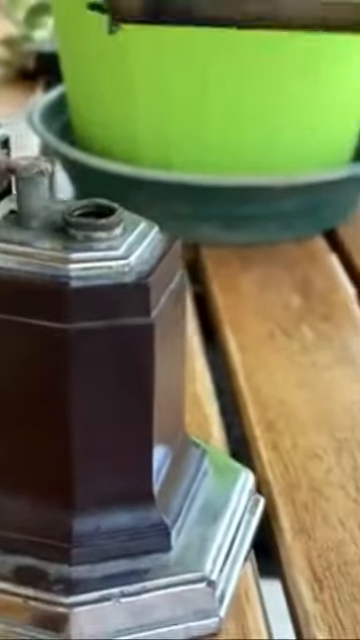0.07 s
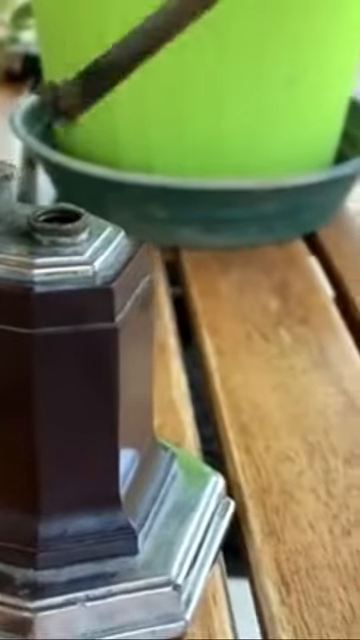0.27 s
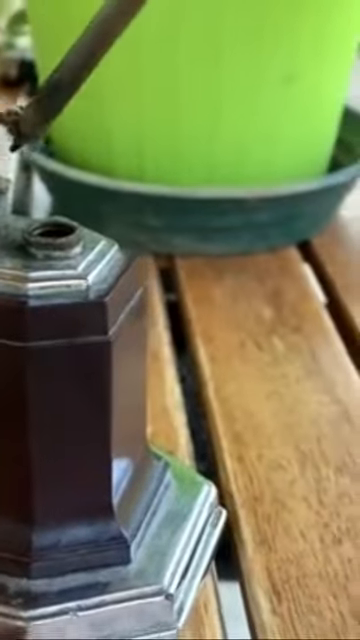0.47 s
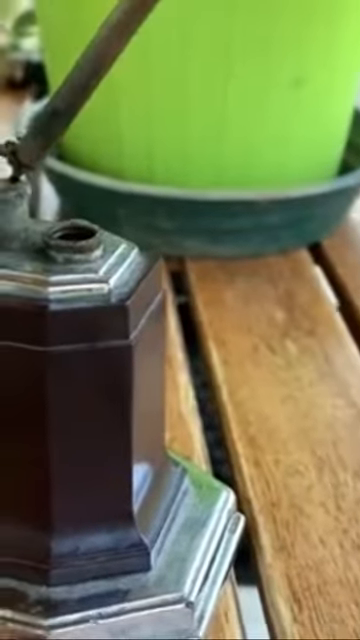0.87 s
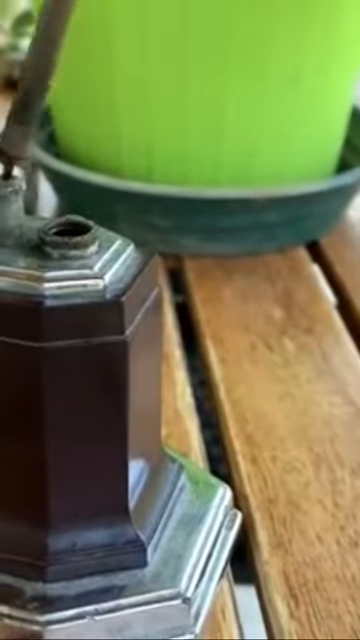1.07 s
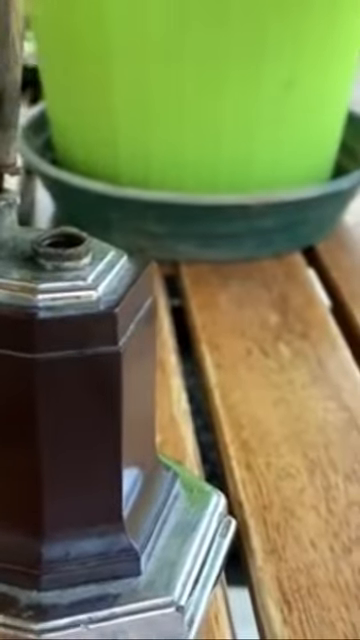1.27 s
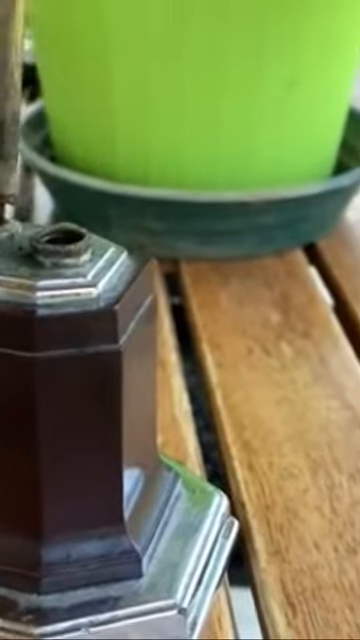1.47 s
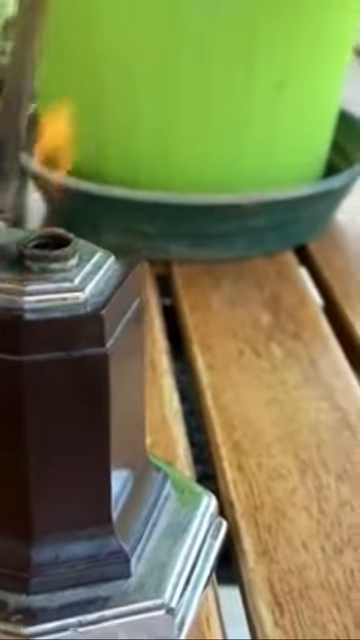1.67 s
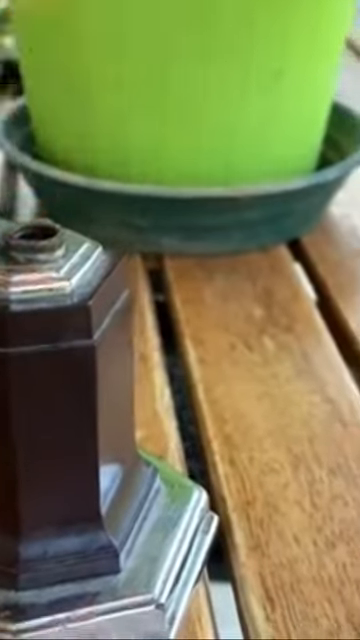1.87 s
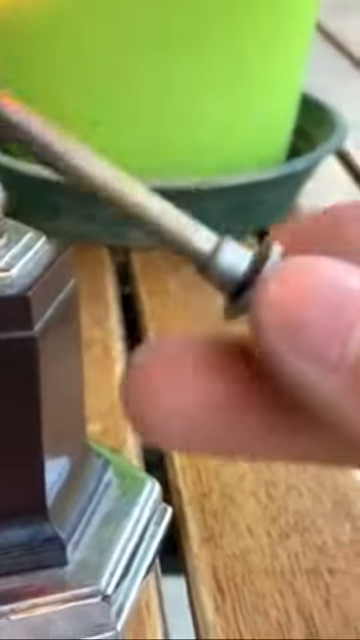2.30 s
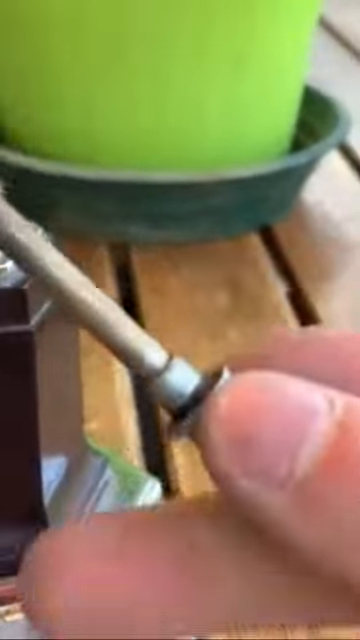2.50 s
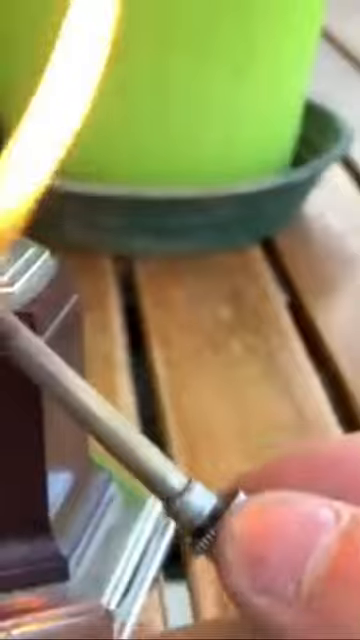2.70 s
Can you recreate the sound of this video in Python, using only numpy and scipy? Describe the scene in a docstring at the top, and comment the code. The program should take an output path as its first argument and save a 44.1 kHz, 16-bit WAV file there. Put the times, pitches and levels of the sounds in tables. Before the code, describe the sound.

Three metallic scrapes of a lighter's striker rod, then a soft flame, among buzzing cicadas.

```python
"""Three metallic scrapes with low thuds, then a fluttering flame, among cicadas outdoors.
A striker rod runs down the flint of a table lighter standing on a wooden garden table; each scrape is a
burst of tiny slips ringing in case, rod and flint, and the last one lights the flame. One cicada pulses
its tymbal clicks, a second joins in on the left and more hiss in the trees, over a faint rumble."""
import sys
import numpy as np
from scipy import signal
from scipy.fft import rfft, irfft
from scipy.io import wavfile
from scipy.ndimage import uniform_filter1d

SR = 44100
rng = np.random.default_rng(int(sys.argv[2]) if len(sys.argv) > 2 else 0)


def file_out(sig):
    """Save sig as 16-bit WAV at sys.argv[1]."""
    # one column per channel
    cols = np.atleast_2d(sig).T
    # limit, then scale
    lim = np.clip(cols, -1, 1)
    pcm = np.round(lim * 32767).astype(np.int16)
    wavfile.write(sys.argv[1], SR, pcm)


N = 125685
T = np.arange(N) / SR
HZ = np.fft.rfftfreq(N, 1 / SR)

# rod slips: peak t/s, rise/s, fall/s, case level/dB, rod level/dB, flint level/dB, relative ring/dB
SLIPS = [(1.3779, 0.0041, 0.0019, -28, -47, -31.5, -14), (1.3943, 0.0024, 0.0031, -17, -19.5, -26.5, -18.5),
         (1.3951, 0.00017, 0.0004, -17, -13, -18.5, -6), (1.5241, 0.0017, 0.021, -42, -55, -48, -5),
         (1.5466, 0.0013, 0.0028, -19.5, -14, -16, -9.5), (1.5475, 0.00092, 0.00089, -34, -11, -20, -10),
         (1.5500, 0.0015, 0.0013, -15.5, -10.5, -14.5, -15), (1.692, 0.011, 0.0042, -44.5, -46, -39, 2),
         (1.7548, 0.00036, 0.002, -27.5, -20.5, -14.5, -2.5),
         (1.7642, 0.0011, 0.0033, -22.5, -19.5, -13.5, -5), (1.77, 0.0011, 0.0018, -36, -21, -20, 6),
         (1.773, 0.0013, 0.0019, -27, -13, -10.5, 1), (1.7792, 0.0019, 0.0013, -32.5, -16.5, -12.5, -4),
         (1.7873, .002, 0.011, -59, -26, -33.5, -11)]


def striker():
    """Case, rod and flint sound together, close to the two microphones."""
    rod_modes = [(4660, -18, .02), (4576, 1.5, 0.023), (5660, -0.5, 0.017), (6800, -16, 0.0068),
                 (7440, -16, 0.021), (7860, 12.5, 0.0085), (8000, -1, 0.015)]  # f/Hz, level/dB, t60/s
    flint_modes = [(9200, 2, 0.087), (10701, -6, 0.09), (10924, -5, .08), (11400, 8, .08), (11575, 0, 0.13),
                   (11900, -8, .09), (12400, 1, .08), (12400, -8, 0.062), (13574, -4, .08),
                   (13600, -1, 0.11), (14444, -1, .08), (14811, 1, .08), (15212, -8, .07)]  # f/Hz, level/dB, t60/s
    rod_grit = [(2000, -22.5), (3400, -9), (4600, 2), (6000, -8), (7500, 6), (8800, 0), (9800, -29),
                (12000, -25)]  # friction spectrum: f/Hz, level/dB
    flint_grit = [(7000, -14.5), (9700, 0.5), (10250, -12), (10700, 0.5), (12600, 6), (15200, -2),
                  (15900, -7)]  # friction spectrum: f/Hz, level/dB
    balance = [(600, -0.5), (1400, 4), (2700, 3.5), (5000, 12.5), (7000, -0.5), (9000, -0.5), (11000, 0)]  # f/Hz, left over right/dB
    left_lead = [(100, 4.5), (700, -1.1), (1500, 1.5), (2600, -1.5), (5000, -3.5), (7000, -5.5), (8100, -2),
                 (10000, -3.0), (10900, 1.94), (15000, 0.2)]  # f/Hz, phase/rad
    mono = case() + scrape(SLIPS, 4, rod_modes, rod_grit, ring_db=-0.5)
    mono += scrape(SLIPS, 5, flint_modes, flint_grit, ring_db=-11.5)
    half = amp(curve(balance, HZ) / 2) * np.exp(.5j * curve(left_lead, HZ))
    return irfft(rfft(mono) * np.array([half, 1 / half]), N)


def case():
    """The rod seats differently on each stroke, colouring the case's rasp and modes."""
    modes = [(576, -5.5, .11), (787, -3, 0.052), (931, -4, 0.083), (1175, -6, 0.04), (1295, -4, .06),
             (1400, -15, 0.054), (1800, -2, .055), (2147, -7, 0.053), (2390, -4, 0.066), (2730, -3.5, .06)]  # f/Hz, level/dB, t60/s
    # friction spectrum per stroke: f/Hz, level/dB
    first = [(100, -34), (420, -26), (590, 2), (900, -0.5), (1040, -8), (1330, 4), (1560, -0.5),
             (1700, -11), (2000, -11), (2220, 1.5), (2750, -3), (3200, -20), (6000, -55)]
    second = [(100, -27), (420, -9.5), (720, 2), (900, -2), (1060, -10), (1270, 2), (1430, 5), (1550, -5),
              (1750, 1), (2050, -1), (2250, -7), (2800, -3.5), (3200, -17), (6000, -30)]
    third = [(100, -34), (350, -29), (560, 4.5), (740, 2.5), (850, -14), (1120, 11), (1330, -3),
             (1480, -17), (1790, -5), (2000, -24), (2480, -1), (3350, -6.5), (6000, -30)]
    out = np.zeros(N)
    for start_s, end_s, grit in (1.3, 1.5, first), (1.5, 1.6, second), (1.6, 1.9, third):
        slips = [slip for slip in SLIPS if start_s < slip[0] < end_s]
        coloured = [(hz, db + curve(grit, hz), t60_s) for hz, db, t60_s in modes]
        out += scrape(slips, 3, coloured, grit, ring_db=2.5)
    return out


def scrape(slips, level_column, modes, grit, ring_db, grains_per_s=9000, spread_db=2.5):
    """Friction grains swell and die with each slip; as the rod lets go, one part rings."""
    envelopes = np.array([amp(slip[level_column]) * spike(*slip[:3]) for slip in slips])
    grains = rng.choice([-1., 1.], N) * amp(spread_db * rng.standard_normal(N))
    grains *= rng.random(N) < grains_per_s / SR
    rasp = signal.oaconvolve(grains, tick(grit))[:N]
    rasp /= np.sqrt(abs(uniform_filter1d(rasp ** 2, size=130)) + 1e-6)  # flatten the level
    out = rasp * np.linalg.norm(envelopes, axis=0)
    hz, db, t60_s = np.transpose(modes)[:, :, None]
    t = T[:SR // 8]
    decay = amp(db - 60 * t / t60_s)
    for slip, envelope in zip(slips, envelopes):
        ring = (decay * np.sin(2 * np.pi * (hz * t + rng.random(hz.shape)))).sum(0)
        gain = amp(slip[-1] + ring_db) * np.linalg.norm(envelope) / np.linalg.norm(ring)
        at = round(slip[0] * SR)
        out[at:at + len(t)] += gain * ring
    return out / (1 + amp(ring_db) / 2)


def knocks():
    """The lighter's foot rocks against the wooden slats."""
    hits = [(1.5499, -14), (1.694, -33.5), (1.772, -24)]  # t/s, level/dB
    wood_modes = [(194, -20, 0.095), (284, -6, 0.12), (383, -8, 0.085), (468, -4, 0.053), (580, -3, 0.044),
                  (690, 5.5, 0.025), (764, 9.5, 0.028), (900, -5, 0.016)]  # f/Hz, level/dB, t60/s
    t = T[:SR // 5]
    ring = sum(amp(db - 60 * t / t60_s) * np.sin(2 * np.pi * hz * t) for hz, db, t60_s in wood_modes)
    ring /= abs(ring).max()
    return sum(amp(db) * np.interp(T - start_s, t, ring, right=0) for start_s, db in hits)


def touch():
    """The rod's tip ticks lightly against the metal."""
    colour = [(300, -26), (1000, -16), (1550, -4), (2100, 5), (2900, -4), (4500, -34), (9000, -60)]  # f/Hz, level/dB
    return amp(-43) * spike(peak_s=.881, rise_s=0.0049, fall_s=0.0087) * noise(colour)


def hollow(waver_hz=14.6, flutter_db=1.5):
    """The body's hollow note drops in pitch on the last stroke and lingers as the flame catches."""
    note = [(1.715, 760, -78), (1.742, 700, -52), (1.758, 560, -42), (1.777, 562.5, -42.5),
            (1.795, 517, -45), (1.83, 557, -62), (1.88, 559, -55), (1.94, 566, -91)]  # t/s, f/Hz, level/dB
    t, hz, db = np.transpose(note)
    turns = np.cumsum(np.interp(T, t, hz) + waver_hz * drift(73)) / SR
    gain = amp(np.interp(T, t, db) + flutter_db * drift(60))
    return gain * np.sqrt(2) * np.sin(2 * np.pi * turns)


def thuds(rise_s=0.0021, sag_s=0.0041):
    """Table thuds and flame puffs: low pushes that sag in pitch as they die."""
    pushes = [(0.755, -25.5, 71, 63.4, 0.017), (.8450, -32.5, 75, 63.5, 0.025),
              (1.044, -36.5, 72, 67.5, 0.05), (1.4, -37, 130, 117, 0.017), (1.5570, -18.5, 164, 91, 0.01),
              (1.695, -37, 150, 120, 0.013), (1.781, -26.5, 105, 64.5, 0.0093),
              (1.8282, -23.5, 360, 134, 0.008), (1.8590, -31, 131, 102.7, 0.023)]  # t/s, level/dB, first f/Hz, last f/Hz, decay/s
    out = np.zeros(N)
    for start_s, db, first_hz, last_hz, decay_s in pushes:
        t = np.maximum(T - start_s, 0)
        turns = last_hz * t + (first_hz - last_hz) * sag_s * (1 - np.exp(-t / sag_s))
        shape = (1 - np.exp(-(t / rise_s) ** 2)) * np.exp(-t / decay_s)
        out -= amp(db) * shape / shape.max() * np.sin(2 * np.pi * turns)
    return out


def flame():
    """Air and flame flutter low; a soft rush as the hand brings the burning rod near."""
    flutter = [(0, -58), (.73, -55), (.76, -34.5), (.81, -43), (.87, -42.5), (.92, -74), (1.07, -60),
               (1.15, -55), (1.53, -53), (1.57, -39), (1.67, -46), (1.75, -53), (1.86, -34.5),
               (1.95, -53.5), (2.05, -69), (2.85, -82)]  # t/s, level/dB
    flutter_colour = [(20, -48), (32, -44), (48, -1), (70, 9), (120, 4.5), (200, -5.5), (400, -24.5),
                      (800, -26.5), (2000, -40), (6000, -75)]  # f/Hz, level/dB
    rush = [(0, -105), (1.5, -102), (1.58, -35), (1.66, -43.5), (1.81, -48.5), (1.833, -44), (1.855, -59),
            (1.95, -53), (2.3, -53.5), (2.52, -46), (2.68, -48.5), (2.85, -48.5)]  # t/s, level/dB
    rush_colour = [(80, 24), (250, 9.5), (500, 9.5), (900, 2), (1800, -2), (4000, -80)]  # f/Hz, level/dB
    return level(flutter) * noise(flutter_colour) + level(rush) * noise(rush_colour)


def near_cicada(edge_s=0.057):
    """The nearest cicada gates its buzz into chirps."""
    chirps = [(0.034, 0.12, -0.5), (0.192, 0.12, -1), (0.355, 0.097, 1.5), (0.518, 0.091, 1.5),
              (0.676, 0.11, 1), (0.847, 0.094, 1), (0.961, 0.12, -3), (1.111, 0.1, 0), (1.261, 0.12, -1),
              (1.421, 0.11, 1.5), (1.591, 0.091, 0), (1.741, 0.12, -2.5), (1.9, 0.11, -1.5),
              (2.025, 0.13, -2.5), (2.17, 0.13, -1.5), (2.34, 0.11, -0.5), (2.489, 0.15, -2),
              (2.649, 0.12, -2), (2.791, .1, -2.5)]  # t/s, length/s, level/dB
    colour = [(1200, -53), (1750, -36), (2100, -15), (2500, -14.5), (3100, -15.5), (3750, -20), (4300, -5),
              (4950, -0.5), (5350, -3), (5700, -3), (6100, -11), (6600, -11.5), (7350, -5), (7750, -12.5),
              (8200, -7), (8800, -16.5), (9700, -30), (10700, -30), (11900, -29.5), (13500, -30),
              (14500, -66)]  # f/Hz, level/dB
    gate = np.zeros(N)
    for start_s, length_s, db in chirps:
        inside_s = np.minimum(T - start_s, start_s + length_s - T)
        gate += amp(db) * np.clip(inside_s / edge_s + .5, 0, 1)
    return amp(-35) * gate * from_trees(tymbal(), colour)


def second_cicada():
    """A second cicada joins in with a broader, steadier rasp."""
    swell = [(.78, -66), (.88, -40), (1.35, -39.5), (1.66, -43.5), (1.72, -66), (1.85, -50), (1.95, -41.5),
             (2.42, -42.5), (2.5, -52.5), (2.85, -49)]  # t/s, level/dB
    colour = [(1400, -42), (2100, -16.5), (3000, -12.5), (3800, -17.5), (4350, -1), (5200, 2), (5750, -1.5),
              (6100, -9), (7300, -5.5), (8100, -8.5), (9000, -57), (14000, -62)]  # f/Hz, level/dB
    return level(swell) * from_trees(tymbal(), colour)


def tymbal(rate_hz=422.7, jitter=.3, spread_db=1.5, leaves_t60_s=0.014, hiss_db=3.5):
    """Uneven tymbal clicks, smeared by foliage and blurred with hiss."""
    turns = np.cumsum(rate_hz * (1 + jitter * drift(150))) / SR
    clicks = np.diff(np.floor(turns), prepend=0) * amp(-spread_db * rng.standard_normal(N))
    leaves = rng.standard_normal((2, SR // 10)) * amp(-60 * T[:SR // 10] / leaves_t60_s)
    buzz = unit(signal.fftconvolve(clicks[None], leaves, axes=1)[:, :N])
    return buzz + amp(hiss_db) * rng.standard_normal((2, N))


def chorus(swell_db=1.0, flicker_db=0.9):
    """Many farther cicadas merge into a wavering hiss."""
    colour = [(1500, -49), (2400, -9.5), (3000, -12.5), (3750, -18.5), (4300, -7.5), (5000, 3), (5600, -1),
              (6300, -9), (7400, -7), (8300, -9.5), (9400, -30), (13000, -34), (15000, -54)]  # f/Hz, level/dB
    gain = amp(-41.5 + swell_db * drift(23) + flicker_db * drift(82))
    return gain * from_trees(rng.standard_normal((2, N)), colour)


def from_trees(pair, colour):
    """Insect sound arrives partly direct, reaching the two microphones out of step."""
    coherence = [(2500, 0.033), (3700, 0.079), (4200, 0.36), (5200, 0.48), (6300, 0.6), (6900, 0.53),
                 (7700, .35), (8400, 0.56), (9500, 1), (13000, 1)]  # f/Hz, left-right coherence
    left_lead = [(4200, 0.75), (5000, -1.3), (5600, -3), (6800, -6.5), (7300, -6), (8000, -4.5), (9200, -4),
                 (10300, -4.5), (11200, 1)]  # f/Hz, phase/rad
    half = np.exp(.5j * curve(left_lead, HZ))
    spectrum = rfft(spread(pair, colour, coherence))
    return ripple(irfft(spectrum * np.array([half, 1 / half]), N))


def ripple(x, depth_db=4, width_hz=39, width_s=0.024):
    """Many paths through the foliage lift and sink narrow bands from moment to moment."""
    hz, t, spectra = signal.stft(x, SR, nperseg=2048)
    field = rng.standard_normal(spectra.shape[1:])
    smooth_bands = np.exp(-((hz[:, None] - hz) / width_hz) ** 2)
    smooth_time = np.exp(-((t[:, None] - t) / width_s) ** 2)
    gain = amp(depth_db * unit(smooth_bands @ field @ smooth_time))
    return unit(signal.istft(spectra * gain, SR)[1][:, :N])


def yard(x, wet_db=-11.5):
    """Scattered reflections from table, pots and walls; the treble dies first."""
    decay = [(200, .35), (700, 0.15), (2000, 0.21), (6000, 0.053), (14000, 0.064)]  # f/Hz, t60/s
    hz, t, spectra = signal.stft(rng.standard_normal((2, SR // 2)), SR, nperseg=256)
    tail = signal.istft(spectra * amp(-60 * t / curve(decay, hz)[:, None]), SR)[1]
    return amp(wet_db) * signal.fftconvolve(x, tail / np.linalg.norm(tail[0]), axes=1)[:, :N]


def air(hum_hz=51.1, waver_hz=2.705, dip_s=2.555, dip_width_s=.065):
    """Outdoor rumble and a faint hum that dips once."""
    rumble = [(20, -45), (32, -30), (50, -1), (80, -4.5), (130, 0.5), (250, -11), (500, -16), (1200, -23),
              (3000, -26.5), (14000, -70)]  # f/Hz, level/dB
    dip = 1 - np.exp(-((T - dip_s) / dip_width_s) ** 2)
    turns = np.cumsum(hum_hz + waver_hz * drift(2.5)) / SR
    hum = amp(-51.5) * dip * np.sqrt(2) * np.sin(2 * np.pi * turns)
    return amp(-57) * noise(rumble) + hum


def noise(colour):
    """Diffuse stereo noise, RMS 1."""
    coherence = [(60, 0.62), (300, 0.92), (700, 0.44), (1200, 0), (8000, 0), (9500, 0), (14000, 1)]  # f/Hz, left-right coherence
    return spread(rng.standard_normal((2, N)), colour, coherence)


def spread(pair, colour, coherence):
    """Colours two unrelated signals and blends them as diffuse sound reaches two microphones."""
    a, b = rfft(pair)
    shared = np.clip(curve(coherence, HZ), -1, 1)
    blend = np.array([a, shared * a + np.sqrt(1 - shared ** 2) * b])
    return unit(irfft(blend * amp(curve(colour, HZ)), N))


def tick(colour, size=4096):
    """Causal click of the given spectrum, energy 1."""
    log_gain = np.log(amp(curve(colour, abs(np.fft.fftfreq(size, 1 / SR)))))
    click = np.fft.ifft(np.exp(np.conj(signal.hilbert(log_gain)))).real
    return click / np.linalg.norm(click)


def spike(peak_s, rise_s, fall_s):
    return np.exp(-np.maximum((peak_s - T) / rise_s, (T - peak_s) / fall_s))


def drift(cutoff_hz):
    """Low-passed random movement, RMS 1."""
    return unit(irfft(rfft(rng.standard_normal(N)) / (1 + (HZ / cutoff_hz) ** 4), N))


def curve(points, hz):
    knots_hz, values = np.transpose(points)
    return np.interp(np.log(hz + 1), np.log(knots_hz + 1), values)


def level(points):
    return amp(np.interp(T, *np.transpose(points)))


def pan_left(db):
    return amp([[db], [-db]])


def amp(db):
    return 10 ** (np.asarray(db) / 20)


def unit(x):
    return x / np.sqrt(np.mean(x ** 2) + 1e-20)


def scene():
    """The lighter stirs the yard's reflections; the thuds are too close and too low to do so."""
    lighter = striker() + knocks() + touch() + hollow()
    insects = pan_left(0.5) * near_cicada() + pan_left(4) * second_cicada() + pan_left(0.3) * chorus()
    return lighter + yard(lighter) + thuds() + air() + flame() + insects


def record(dry, low_cut_hz=38.5, ceiling=0.71, high_cut_hz=15950):
    """The microphone sheds the deepest rumble and rounds off peaks; then a band limit."""
    low_cut = signal.butter(3, low_cut_hz, "highpass", fs=SR, output="sos")
    high_cut = signal.firwin(401, high_cut_hz, window=("kaiser", 9), fs=SR)
    rounded = ceiling * np.tanh(signal.sosfilt(low_cut, dry) / ceiling)
    return signal.oaconvolve(rounded, high_cut[None], "same")


dry = scene()
out = record(dry)
file_out(out)
```